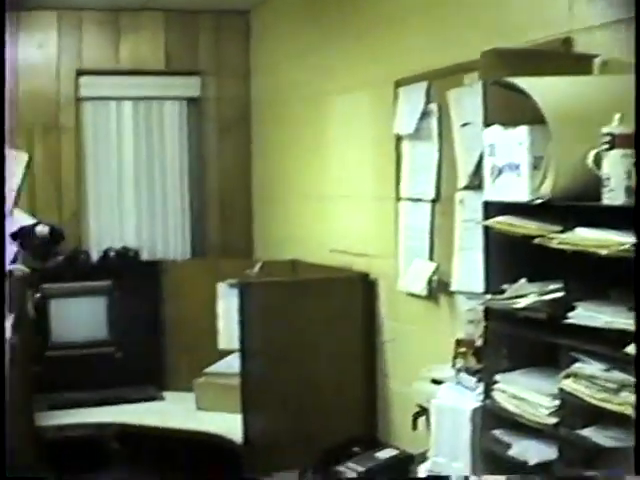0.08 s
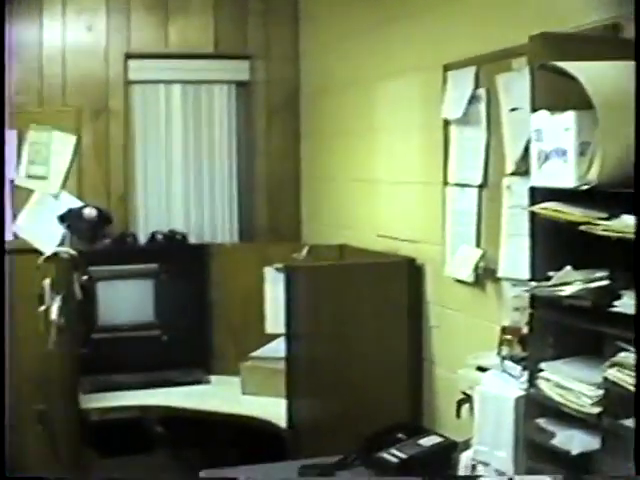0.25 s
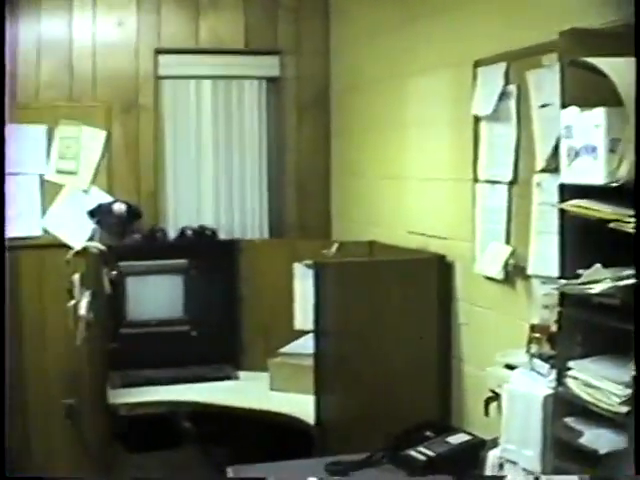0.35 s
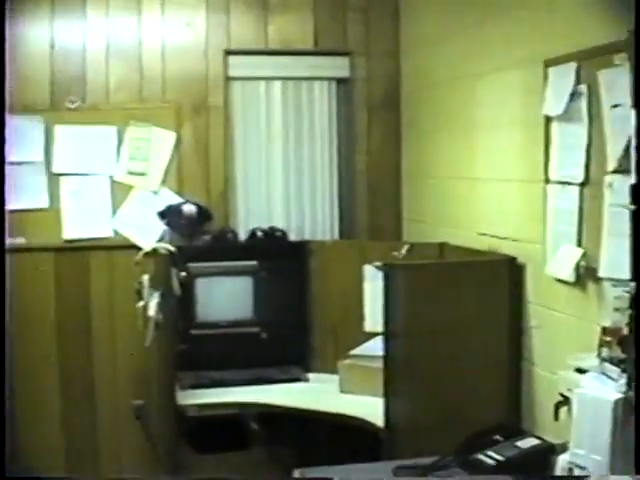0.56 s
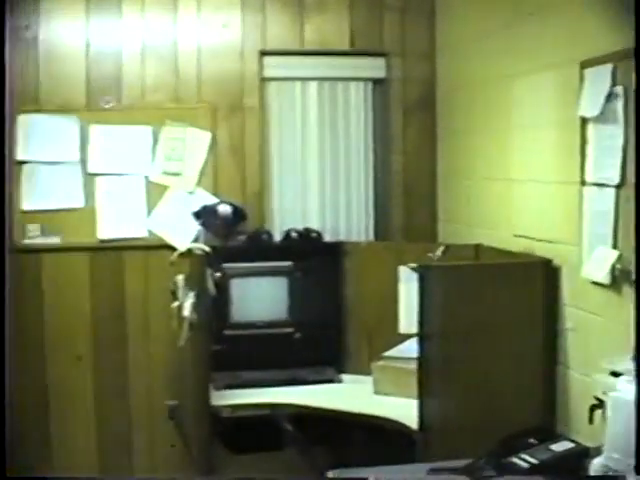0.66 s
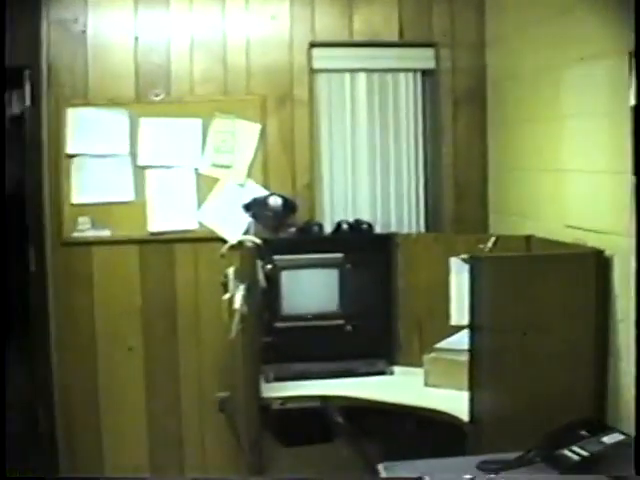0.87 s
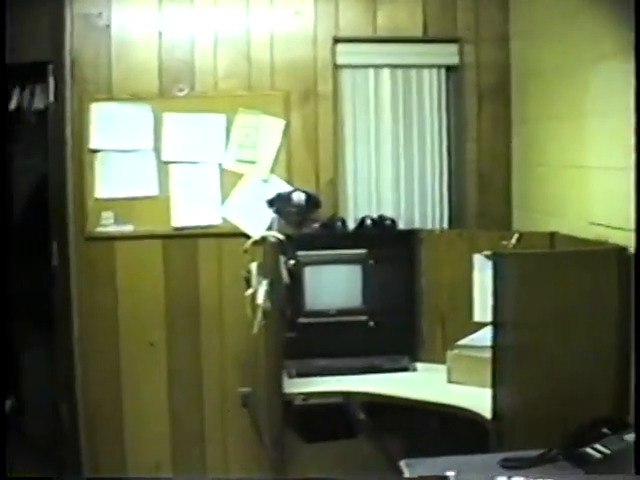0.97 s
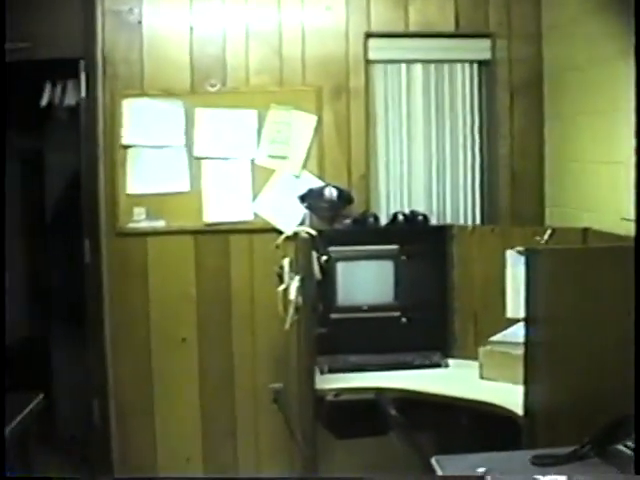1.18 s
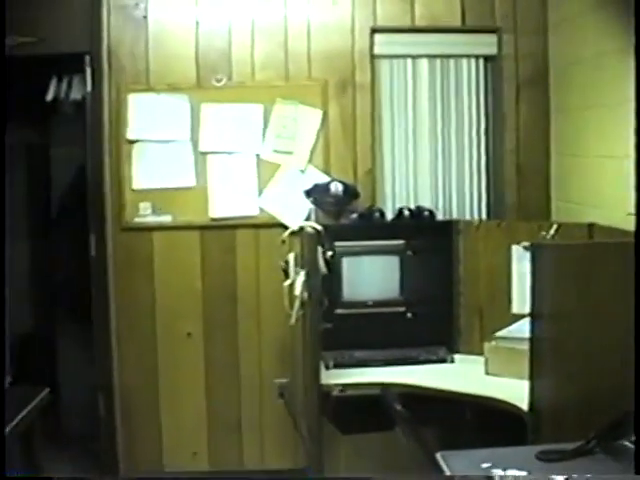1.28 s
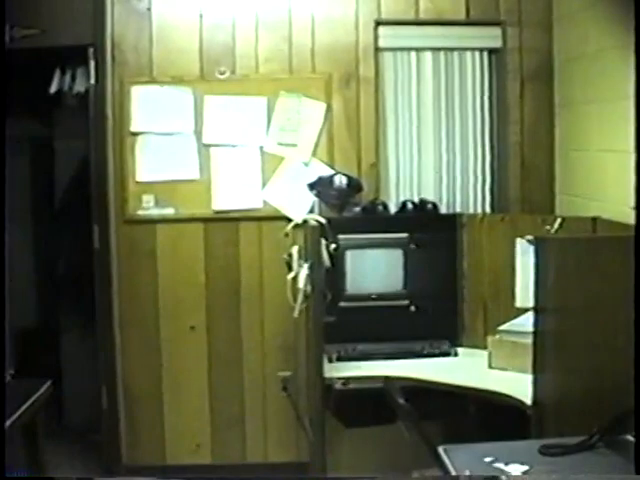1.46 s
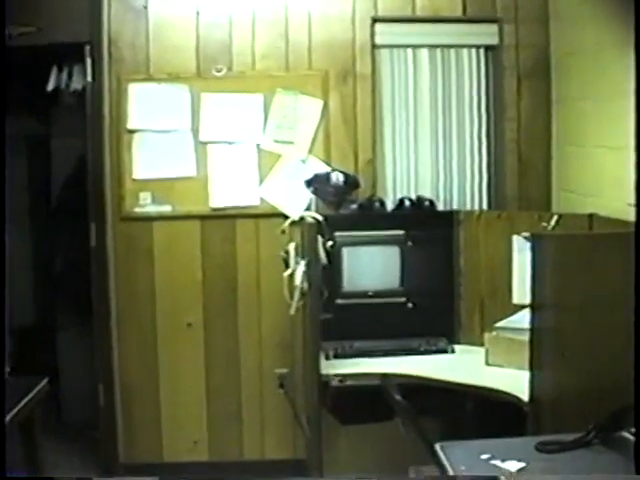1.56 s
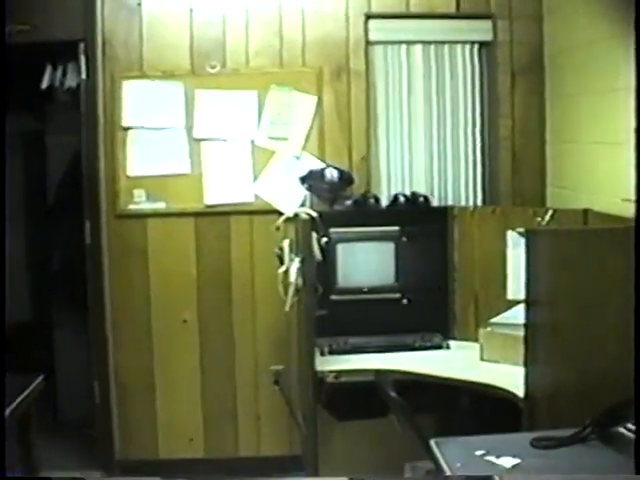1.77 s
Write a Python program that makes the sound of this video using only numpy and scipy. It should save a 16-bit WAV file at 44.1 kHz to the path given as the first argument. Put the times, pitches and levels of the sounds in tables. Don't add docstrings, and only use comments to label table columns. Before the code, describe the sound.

A hand-held tape camera's motor whines and hums over soft hiss in a quiet office; a loud hollow knock comes early, then plastic clicks, soft bumps and a lighter knock, all very close to the built-in microphone.

```python
import sys
import numpy as np
from scipy import signal
from scipy.fft import rfft, irfft
from scipy.io import wavfile

SR = 44100
rng = np.random.default_rng(int(sys.argv[2]) if len(sys.argv) > 2 else 0)


def gain_from_db(level_db):
    decades = np.asarray(level_db, float) / 20
    return 10 ** decades


def unload_wav(signal):
    wavfile.write(
        sys.argv[1],
        SR,
        np.round(np.clip(np.atleast_2d(signal).T, -1, 1) * 32767).astype(np.int16),
    )


N = 79380

MOTOR_ORDERS = [-58, -80, -74, -79, -80, -74, -73, -66, -64, -63, -67, -90, -68, -75, -86, -74, -79, -76,
                -87, -76, -90, -90, -88, -74, -81, -78, -80, -75, -87, -74, -70, -77, -73, -76, -86, -83]
CROSSTALK = [-76, -84, -86, -79, -76, -88, -83, -86, -77, -87, -80, -86, -78, -85, -79, -85, -82, -86, -78,
             -86, -90, -87, -80, -89]
# time_s, pitch_hz (unused), level_db
WHINE_LEVEL = [
    (0.0, 2161, -48),
    (0.084, 2156, -49.5),
    (0.24, 2156, -63.5),
    (0.25, 2157, -58),
    (0.386, 2156, -51),
    (0.7, 2157, -48),
    (1.658, 2156, -55.5),
    (1.8, 2154, -52.5),
]
# pitch_hz, level_db, width_hz
GEAR_TONES = [(1124, -67, 6), (1228, -63, 9), (1298, -70, 6), (2120, -68, 12), (2460, -76, 6),
              (4387, -78, 8), (6180, -77, 10), (15735, -81, 1.5)]
# centre_hz, width_hz, level_db
RUMBLE_MODES = [(45, 22, -63), (92, 23, -63), (129.6, 107, -59), (183, 33.4, -53), (231.4, 43, -53.5),
                (269.6, 44, -58.5), (450, 320, -65.5)]
# freq_hz, density_db (per Hz)
HISS_SHAPE = [(500, -4), (820, -4.5), (1200, -1), (3200, -6), (4500, -4.5), (6200, -7), (7000, -9.5),
              (15500, -19)]
# pitch_hz, t60_s, lag_ms, rise_ms
BUMP_MODES = [(98, .17, 5.5, 3.2), (208, .15, 1., 4.), (240, .13, 3.3, 2.5), (500, .014, .6, .3)]
# start_s, low_mode_db, second_db, third_db, upper_db (peaks)
BUMPS = [
    (.001, -36.5, -57, -47, -42),
    (0.111, -44, -48, -50, -58),
    (.374, -37, -56, -39, -60),
    (0.502, -63, -47, -39, -61),
    (0.7337, -32.5, -38.5, -38.5, -33.5),
    (1.158, -65, -49, -37, -64),
    (1.557, -40, -67, -40, -55),
    (1.683, -27.5, -49, -37, -45),
    (1.743, -44, -56, -40, -43),
]
# pitch_hz, peak_db, t60_s, lag_ms, rise_ms
HARD_MODES = [(96, -23, .16, 5.47, 1.), (208, -3.3, .072, .82, 10.), (232, -9.5, .083, 4.75, 2.2),
              (266, 0, .047, .71, 10.), (336, -14, .042, 3.23, 10.), (454, -22, .05, 1.54, .7),
              (715, -19, .022, 1.32, 2.4), (895, -20, .018, 1.3, 4.2), (150, -30, .12, 5., 4.),
              (1180, -32, .016, 2.2, .8)]
# pitch_hz, peak_db, t60_s, lag_ms, rise_ms
LIGHT_MODES = [(98, -30, .162, 3.33, 1.), (181, -31, .113, 1.35, 10.), (249, -24.5, .074, -.29, 1.7),
               (490, -32, .041, .49, .8), (556, -21, .025, .75, 5.4), (1012, -35, .015, -.44, .8),
               (1650, -34, .009, .3, .2)]
# start_s, peak_db, decay_ms, ring_hz, ring_db (against the snap)
TICK_EVENTS = [
    (.2148, -33, 1.3, 5600, 0),
    (.2158, -39, 1.2, 3850, 10),
    (.2163, -40, 1., 7000, 9),
    (.3237, -31, 1.8, 6000, -10),
    (.7193, -41, 1.2, 3400, -2),
    (.7330, -45, 1.8, 2950, 6),
    (1.1037, -40, 1., 6050, -2),
    (1.6848, -32, 1.5, 5900, -5),
    (1.6850, -46, 1., 4600, 6),
    (1.716, -47, 1.2, 6200, -6),
]

HARD_S, LIGHT_S = .2155, 1.1035


def curve(points, x, col=1):
    p = np.array(points, float)
    return np.interp(x, p[:, 0], p[:, col])


def unit(x):
    return x / np.sqrt(np.mean(x ** 2))


def noise():
    return rng.standard_normal(N)


def band(x, hz, width_hz):
    return signal.lfilter(*signal.iirpeak(hz, hz / width_hz, fs=SR), x)


def resonance(hz, width_hz):
    return unit(band(band(noise(), hz, width_hz), hz, 2 * width_hz))


def coloured(gain):
    return unit(irfft(rfft(noise()) * gain, N))


def walk(rate_hz):
    low_pass = signal.butter(2, rate_hz, fs=SR, output="sos")
    drift = signal.sosfiltfilt(low_pass, rng.standard_normal(N + SR))
    return unit(drift[SR // 2:SR // 2 + N])


def motor(t):
    drum_hz, wobble_rad, wobble_hz = 179.82, .055, 9.
    order_flicker_db, order_spread_rad = 1.2, .2527
    turn = 2 * np.pi * drum_hz * t
    phase = turn + wobble_rad * walk(wobble_hz)
    tones = np.zeros(N)
    for k, db in enumerate(MOTOR_ORDERS):
        level = gain_from_db(db + order_flicker_db * walk(5.1))
        tones += level * np.cos((k + 1) * phase + order_spread_rad * k ** 1.5)
    starts_rad = rng.uniform(0, 2 * np.pi, size=len(CROSSTALK))
    for k, db in enumerate(CROSSTALK):
        tones += gain_from_db(db) * np.cos((40 + 2 * k) * turn + starts_rad[k])
    return np.sqrt(2) * tones + whine(t, phase), phase


def whine(t, phase):
    skirt_db, skirt_hz, skirt_width_hz = -18, 2177, 75.5
    tone = np.sqrt(2) * np.cos(12 * phase)
    skirt = gain_from_db(skirt_db) * unit(band(noise(), skirt_hz, skirt_width_hz))
    return gain_from_db(curve(WHINE_LEVEL, t, col=2)) * (tone + skirt)


def gears():
    out = np.zeros(N)
    for hz, db, width_hz in GEAR_TONES:
        level = np.sqrt(2) * gain_from_db(db + 1.9 * walk(24))
        pitch_hz = hz + width_hz / 2 * walk(6.44)
        out += level * np.cos(2 * np.pi * np.cumsum(pitch_hz) / SR)
    return out


def rumble():
    swell_db, flicker_db = .5 * walk(2), .8
    out = np.zeros(N)
    for hz, width_hz, db in RUMBLE_MODES:
        out += gain_from_db(db + swell_db + flicker_db * walk(26)) * resonance(hz, width_hz)
    return out


def hiss(phase):
    level_db, flicker_db, gate = -54.5, .25, .22
    log_hz = np.log(np.fft.rfftfreq(N, 1 / SR) + 1)
    shape_hz, shape_db = np.transpose(HISS_SHAPE)
    steady = coloured(gain_from_db(np.interp(log_hz, np.log(shape_hz), shape_db)))
    return gain_from_db(level_db + flicker_db * walk(21)) * steady * (1 + gate * np.cos(phase))


def ring(t, start_s, hz, db, t60_s, lag_ms, rise_ms):
    u = np.maximum(t - start_s - lag_ms / 1000, 0)
    rise = 1 - np.exp(-u * 1000 / rise_ms)
    decay = np.exp(-u * np.log(1000) / t60_s)
    return -gain_from_db(db) * rise * decay * np.sin(2 * np.pi * hz * u)


def knocks(t):
    out = np.zeros(N)
    for start_s, *levels_db in BUMPS:
        for db, (hz, *shape) in zip(levels_db, BUMP_MODES):
            out += ring(t, start_s, hz, db, *shape)
    for start_s, modes in ((HARD_S, HARD_MODES), (LIGHT_S, LIGHT_MODES)):
        for mode in modes:
            out += ring(t, start_s, *mode)
    return out


def ticks(t):
    tilt_db, top_hz = -4, 11000
    rise_ms, tail_db, tail_ms, ring_stretch = .2, -26, 12, 1.5
    hz = np.fft.rfftfreq(N, 1 / SR)
    tilt = gain_from_db(tilt_db * np.log2(np.maximum(hz, 4000) / 4000))
    grit = coloured(tilt * (hz > 400) / (1 + (hz / top_hz) ** 20))
    out = np.zeros(N)
    for start_s, db, decay_ms, ring_hz, ring_db in TICK_EVENTS:
        u_ms = np.maximum(t - start_s, 0) * 1000
        fall = np.exp(-u_ms / decay_ms) + gain_from_db(tail_db) * np.exp(-u_ms / tail_ms)
        env = (1 - np.exp(-u_ms / rise_ms)) * fall
        snap = env * grit
        ring_env = env ** (1 / ring_stretch) * np.exp(-u_ms / 4)
        shell = gain_from_db(ring_db) * ring_env * np.sin(2 * np.pi * ring_hz * (t - start_s))
        out += gain_from_db(db) * (snap / np.abs(snap).max() + shell)
    return out


def shudder(t):
    level_db, centre_hz, width_hz, rise_s, t60_s = -36, 298, 265, .004, .19
    u = np.maximum(t - HARD_S, 0)
    env = (1 - np.exp(-u / rise_s)) * np.exp(-u * np.log(1000) / t60_s)
    return gain_from_db(level_db) * env * resonance(centre_hz, width_hz)


def scene():
    t = np.arange(N) / SR
    drum, phase = motor(t)
    mix = drum + gears() + rumble() + hiss(phase) + knocks(t) + ticks(t) + shudder(t)
    return mix[None]


def top_cut(x):
    return signal.sosfilt(signal.butter(12, 16130, fs=SR, output="sos"), x)


def record(dry):
    low_cut_hz, top_hz = 55, 15810
    microphone = signal.butter(2, low_cut_hz, "high", fs=SR, output="sos")
    tape = signal.ellip(10, .3, 60, top_hz, fs=SR, output="sos")
    mix = signal.sosfilt(tape, signal.sosfilt(microphone, dry))
    return top_cut(mix)


dry = scene()
out = record(dry)
unload_wav(out)
```